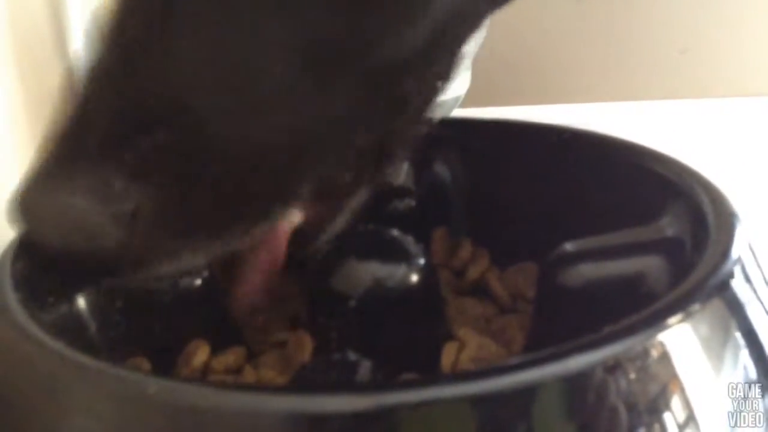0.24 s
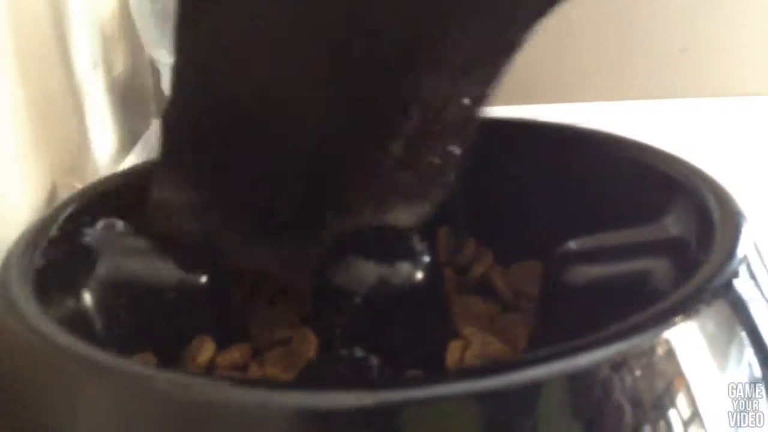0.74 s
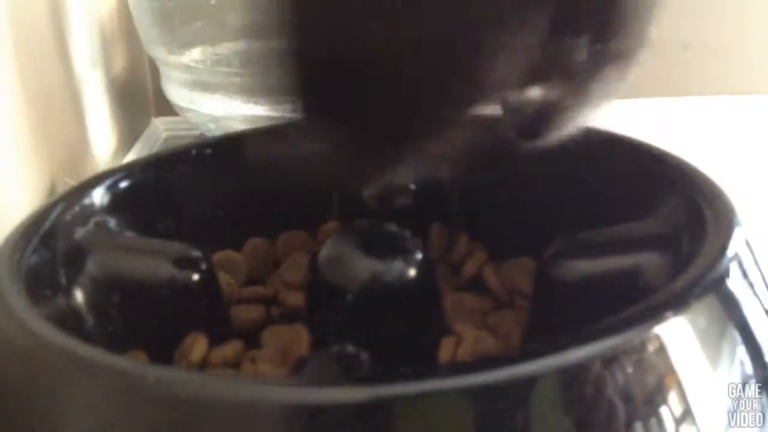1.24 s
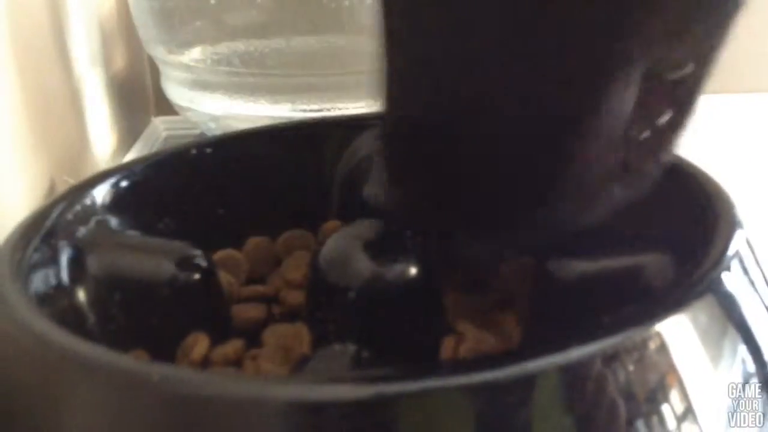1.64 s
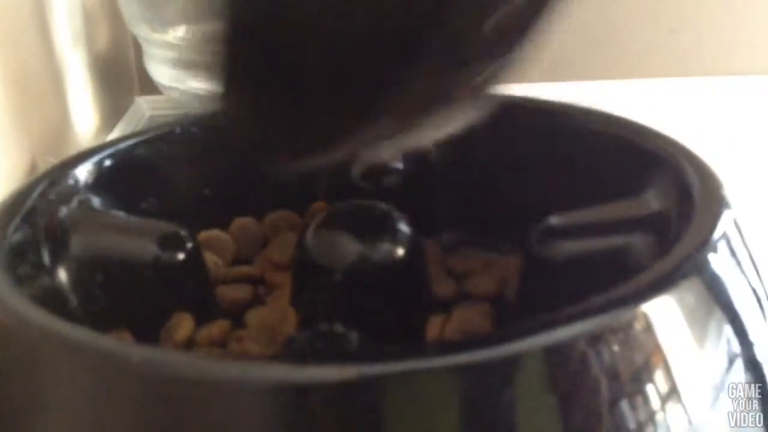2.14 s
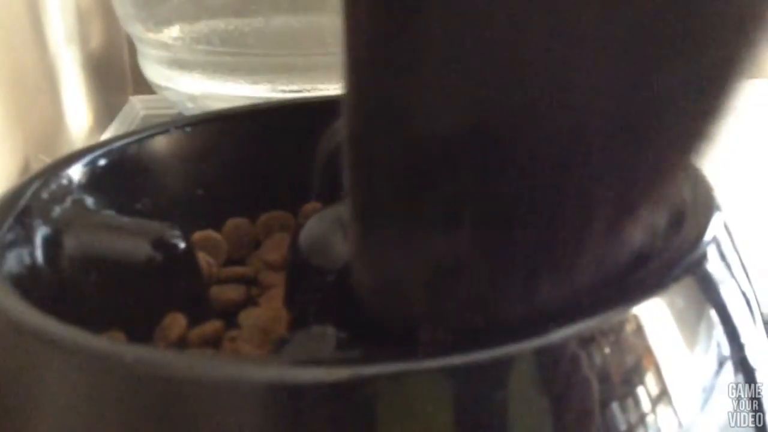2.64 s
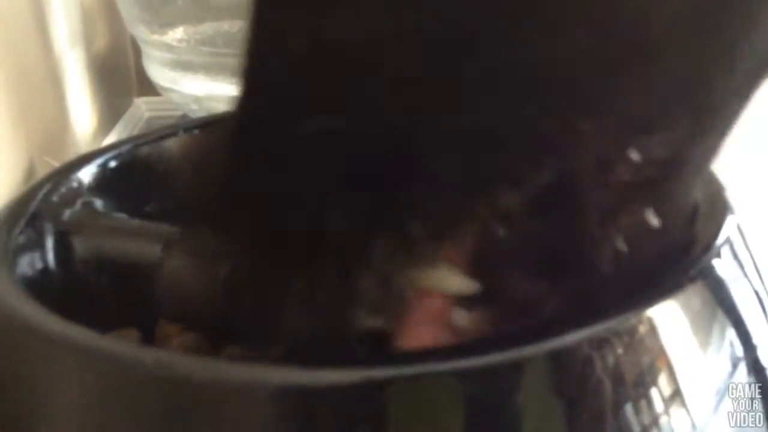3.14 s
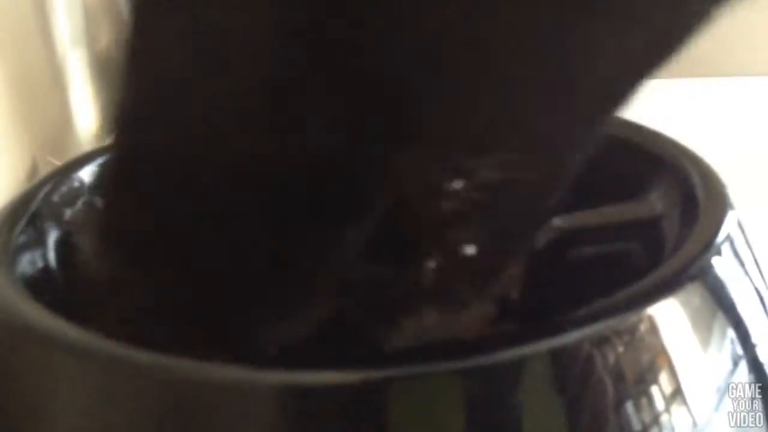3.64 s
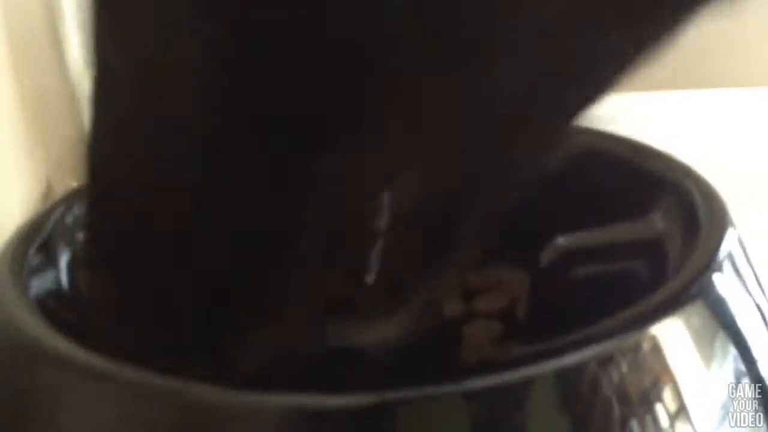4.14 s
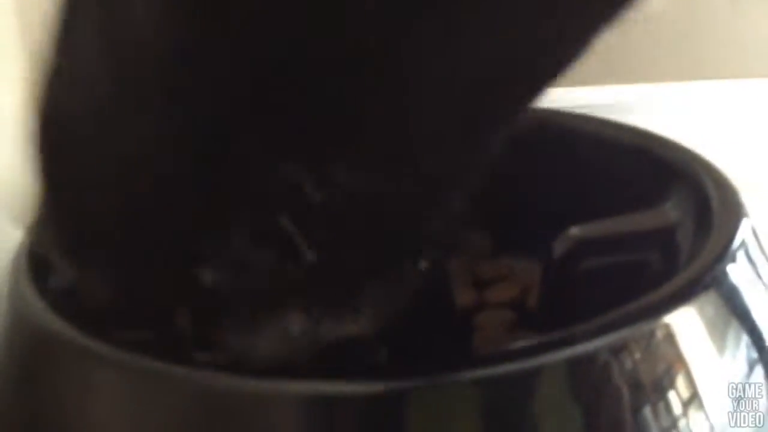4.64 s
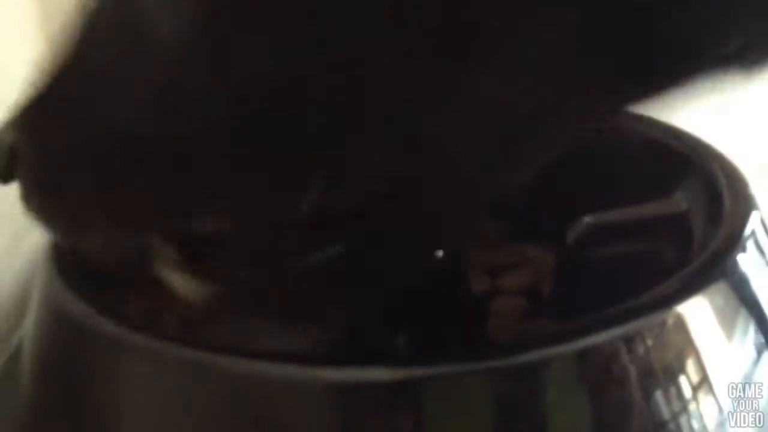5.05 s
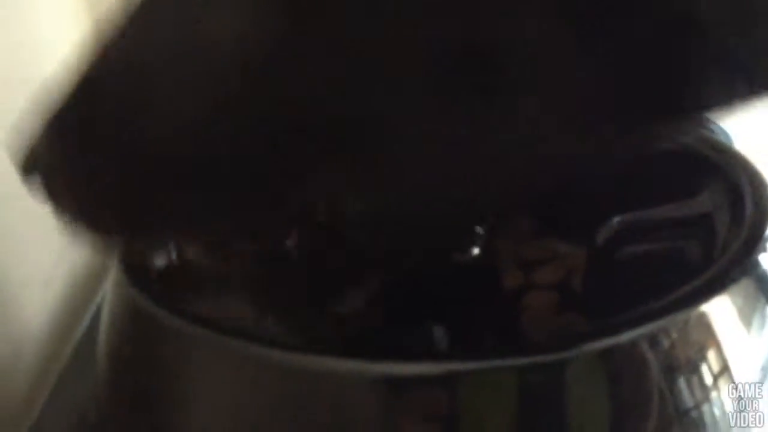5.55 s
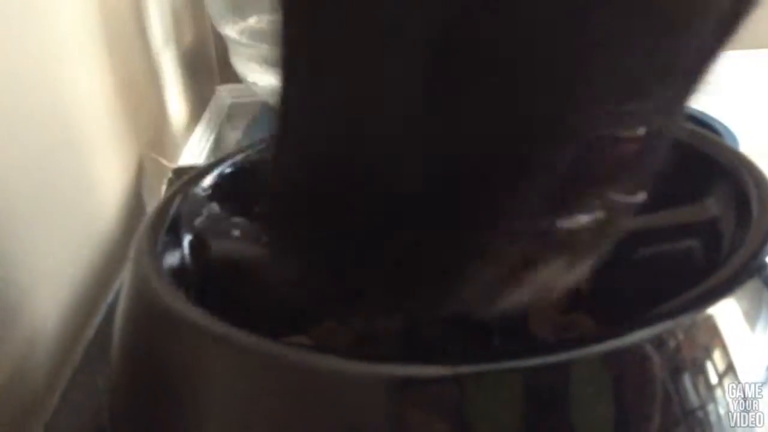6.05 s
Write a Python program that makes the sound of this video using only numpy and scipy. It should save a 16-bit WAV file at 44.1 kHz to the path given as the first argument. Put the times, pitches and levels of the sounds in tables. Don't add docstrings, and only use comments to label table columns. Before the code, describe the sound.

Close, crisp dog eating indoors: kibble rattling and snapping, teeth tapping the bowl, the bowl knocking on its stand, tongue licking and slurping.

```python
import sys
import numpy as np
from scipy import signal
from scipy.fft import rfft, irfft, next_fast_len
from scipy.io import wavfile
from scipy.ndimage import uniform_filter1d, map_coordinates

SR = 44100
rng = np.random.default_rng(int(sys.argv[2]) if len(sys.argv) > 2 else 0)


def wav_out(sig):
    wavfile.write(sys.argv[1], SR, np.round(np.clip(np.atleast_2d(sig).T, -1, 1) * 32767).astype(np.int16))


def voltage_ratio(decibels):
    exponent = np.asarray(decibels, float) / 20
    return 10 ** exponent


N = 277389

# frequency in Hz, level in dB per Hz.
HUSH_SPECTRUM = [(30, -9), (90, -18), (200, 1), (4500, -21), (5800, -22), (15300, -23)]
# frequency in Hz, t60 in seconds.
ROOM_T60 = [(200, 0.4), (3000, 0.13), (14000, 0.14)]
# frequency in Hz, level in dB per Hz.
LICK_SPECTRUM = [(90, -19.5), (230, -2.5), (365, -10), (620, -5.5), (1500, -7.5), (5000, -38.5)]
# start in seconds, end in seconds, cavity from Hz, cavity to Hz, level in dB.
SLURPS = [
    (1.45, 1.521, 592, 1004, -49),
    (5.735, 5.79, 470, 898, -41),
    (5.764, 5.82, 2300, 2800, -37.5),
    (1.436, 1.47, 1550, 1850, -50.5),
    (5.83, 5.89, 861, 510, -39.5),
    (6.1, 6.17, 600, 860, -41.5),
    (2.547, 2.573, 550, 540, -41),
    (3.5, 3.54, 520, 600, -42.5),
]
# time in seconds, level in dB, mouth cavity in Hz.
SMACKS = [(0.521, -39.5, 630), (0.649, -20, 1025), (0.661, -30.5, 408), (0.949, -35.5, 950),
          (1.21, -43, 526), (1.666, -47.5, 560), (2.305, -35, 560), (2.788, -48.5, 607), (3.03, -37, 680),
          (3.788, -36.5, 530), (4.072, -32.5, 797), (4.394, -36.5, 530), (4.441, -42, 720),
          (4.523, -42, 424), (4.536, -53, 460), (4.547, -49, 436), (5.011, -51, 600), (5.076, -35.5, 863),
          (5.519, -37, 560), (5.858, -35, 624), (5.889, -28, 877), (6.069, -49.5, 1590), (6.142, -38, 797)]
# time in seconds, level in dB, strongest mode in Hz.
KNOCKS = [(0.004, -33, 209), (0.542, -23.5, 174), (0.653, -31, 353), (0.85, -36, 248), (0.899, -35, 272),
          (0.975, -22, 242), (1.301, -36, 204), (1.588, -49, 190), (1.667, -34.5, 260), (1.836, -22, 226),
          (1.893, -21.5, 207), (1.941, -37, 203), (2.307, -38, 298), (2.53, -36.5, 202), (2.8, -34.5, 247),
          (2.835, -19.5, 256), (3.2102, -17.5, 233), (3.2218, -21, 235), (3.2342, -18, 236),
          (3.2458, -22, 235), (3.29, -31, 215), (3.372, -30.5, 230), (3.437, -30, 223), (3.554, -16, 233),
          (3.79, -38, 246), (3.816, -35, 230), (4.071, -36, 284), (4.126, -25, 246), (4.469, -29, 202),
          (4.876, -38, 305), (4.993, -24.5, 226), (5.012, -26, 240), (5.729, -40.5, 190), (5.86, -31, 170),
          (5.89, -26.5, 220), (6.15, -41, 237)]
# centre in Hz, width in Hz, level in dB.
STAND_MODES = [(190, 108, -3), (219, 52, 0.5), (307.3, 45, -3), (558, 61, -7)]
WALL_MODES = [(1000, 200, -15), (1123, 80, -2), (1495, 95, -8), (1690, 130, -7), (1990, 130, -9)]
RIM_MODES = [(2544, 315, 1.5), (2680, 355, 5), (2931, 735, -0.5)]
PELLET_MODES = [(4450, 800, 0), (5100, 900, -1)]
CRACK_MODES = [(6500, 1800, -9), (8250, 1200, 0.5), (10500, 2600, -7.5), (13000, 4500, -9)]
# time in seconds, level in dB, pitch in Hz.
CLINKS = [(0.065, -36, 1050), (0.1146, -30.5, 1120), (0.1672, -30, 3160), (0.4084, -37.5, 2940),
          (0.442, -35, 2740), (0.454, -36, 2730), (0.6185, -34, 1700), (0.6555, -22, 2740),
          (0.663, -26.5, 2960), (0.814, -32.5, 2870), (0.9572, -28, 1100.0), (0.9749, -30, 1047),
          (0.997, -36, 994), (0.649, -16, 1040), (1.5478, -41.5, 1485), (2.992, -11, 1130),
          (2.3242, -33, 677), (2.5327, -40, 3050), (5.294, -25, 1143), (2.848, -32, 2770),
          (3.019, -29, 2660), (3.275, -20.5, 3050), (3.4163, -21, 1555), (3.5606, -24, 1126),
          (3.6006, -26, 1520), (3.6147, -34, 2770), (3.6358, -26, 2660), (3.664, -31, 1530),
          (3.7152, -25, 2670), (3.7944, -30.5, 1730), (3.836, -31.5, 3090), (3.8935, -34, 2740),
          (5.162, -24.5, 1143), (4.1476, -34, 1670), (4.1988, -31.5, 1720.0), (4.4583, -32, 1160),
          (4.4682, -25.5, 2790), (4.7392, -34, 985), (4.8954, -38, 2930), (4.9242, -32, 1063),
          (5.013, -28, 2710), (5.1732, -27, 3030), (5.1782, -28, 2670), (5.186, -31, 1125),
          (5.1952, -37, 2720), (5.2156, -32, 2710.0), (5.296, -23.5, 2830), (5.3462, -27.5, 1148),
          (5.4172, -28.5, 2680), (1.4213, -37, 1700), (5.5454, -38, 592), (3.057, -35, 1124),
          (5.7638, -36, 2570), (5.776, -34, 834), (5.7902, -33, 2550), (5.8216, -26, 2750),
          (5.8327, -33, 2410), (5.859, -37, 1070.0), (5.8931, -29, 2520), (3.012, -20.5, 1110)]
# time in seconds, level in dB, pitch in Hz.
CLACKS = [(0.3547, -36, 4440), (0.6051, -36, 4670), (0.6121, -38, 4560), (0.6281, -22.5, 5040),
          (0.6405, -33, 4730), (0.9498, -23, 4760.0), (1.2901, -36, 4020), (1.4722, -42, 4090.0),
          (1.4866, -42, 4870.0), (1.6772, -47, 4000.0), (1.74, -22.5, 4750), (1.746, -27, 4500),
          (1.7605, -30, 4800), (1.8338, -25, 4730), (1.8518, -25, 5020), (1.9291, -31, 4830),
          (1.9496, -30, 4650), (2.3202, -30.5, 4350), (2.3721, -50, 5040.0), (2.3816, -41, 4820),
          (2.4434, -46, 4550), (2.6185, -38, 3960), (2.9742, -26.5, 5600), (3.0775, -25, 4400),
          (3.1234, -24, 4480), (3.1927, -39, 4740), (3.2376, -30, 4900), (3.7315, -26.5, 4740),
          (3.9555, -43, 4100), (4.1401, -37, 4000), (4.164, -38, 4500), (4.2643, -41, 4930),
          (4.5881, -43.5, 4400), (4.6953, -41.5, 4920), (1.402, -45, 2300), (4.8719, -46, 4580.0),
          (5.0226, -21.5, 4440), (5.3134, -33, 4900), (5.922, -41, 4170), (2.904, -40, 5250)]
# time in seconds, level in dB, pitch in Hz.
SPLINTERS = [(0.0294, -35.5, 10900), (0.0379, -33, 13700), (0.1092, -30.5, 13300), (0.1442, -31.5, 12500),
             (0.3248, -34, 8900), (0.5822, -34, 9200), (0.648, -31, 12650.0), (0.6535, -30, 13600),
             (0.9498, -32, 13900), (0.9957, -35, 13500), (5.007, -31, 13100), (1.2302, -39, 8300),
             (1.2452, -38, 14100.0), (1.2711, -43, 11770.0), (2.0269, -40, 8750), (4.1041, -36, 13400),
             (2.3112, -39, 14000), (2.3417, -40, 12790.0), (1.4501, -31, 12800), (2.5322, -37, 13670.0),
             (2.5871, -24, 10000), (2.8301, -41, 14280.0), (2.8435, -32.5, 8200), (2.9842, -22, 8260),
             (3.1633, -22, 8040), (3.1987, -25, 7900), (3.2686, -22, 13570.0), (3.4462, -23, 8150),
             (3.4706, -23.5, 13600), (3.8258, -36, 11400.0), (3.9475, -44, 8080.0), (4.1067, -32, 7900),
             (4.199, -22, 7980), (4.4115, -40, 13300), (4.4304, -39, 8050.0), (4.7402, -42, 8300),
             (4.164, -32, 13200), (4.8495, -37, 14400), (5.0326, -20, 8100), (5.0934, -23, 8400),
             (5.3, -28, 12800.0), (5.4631, -41, 7640), (5.5175, -42, 13700), (5.5579, -42, 13940.0),
             (5.8396, -43, 14200), (5.8901, -27, 14350.0)]
# start in seconds, held in seconds, level in dB.
STROKES = [(0, 0.033, -41), (0.099, 0.097, -38), (0.279, 0.12, -41.5), (0.439, 0.018, -40),
           (0.512, 0.15, -36.5), (0.816, 0.077, -39.5), (0.921, 0.11, -39.5), (1.21, 0.017, -46),
           (1.285, 0.024, -48), (1.42, 0.11, -50), (1.66, 0.058, -48.5), (1.74, 0.032, -36.5),
           (1.816, .05, -31.5), (1.87, 0.057, -29), (1.93, 0.029, -33.5), (2.009, .02, -46),
           (2.092, 0.031, -44.5), (2.189, 0.027, -42.5), (2.301, 0.011, -42.5), (2.335, 0.14, -49.5),
           (2.516, 0.011, -36.5), (2.578, 0.067, -42.5), (2.79, .03, -42), (2.835, 0.049, -34),
           (2.905, .04, -37), (2.95, 0.024, -23.5), (2.978, 0.053, -23), (3.052, 0.024, -29),
           (3.113, 0.039, -19.5), (3.19, 0.13, -31), (3.396, 0.04, -26.5), (3.5, 0.03, -40),
           (3.556, .095, -35.5), (3.699, 0.03, -27), (3.787, 0.096, -31.5), (3.94, 0.087, -40),
           (4.065, 0.12, -35.5), (4.255, 0.05, -42.5), (4.379, 0.076, -33), (4.5, 0.043, -50.5),
           (4.677, .12, -44.5), (4.889, 0.065, -33), (5.005, 0.069, -22), (5.16, 0.03, -29),
           (5.288, 0.047, -29), (5.414, 0.026, -43), (5.51, 0.043, -41), (5.712, 0.1, -41),
           (5.969, 0.027, -48), (6.1, 0.042, -45), (6.261, 0.028, -48)]
# time in seconds, idle shuffling in dB, dryness in dB, wetness in dB.
MUZZLE = [(0, -49.5, 3.5, -3.5), (.7, -47, 3, 0.5), (1.18, -52.5, 2.5, 4), (1.3, -51, 9, -1),
          (1.6, -55, 2, -5), (1.72, -48, 0, -3.5), (2.28, -67, 1.5, 0.5), (2.44, -52, 12.5, -3),
          (2.68, -73, 0.5, -3.5), (2.77, -83, -1, 5), (2.9, -43, -0.5, -7.5), (3.5, -44.5, 0, -3),
          (4, -50.5, -4, -3.5), (4.631, -64, -4, 4.5), (5.1, -32, 2, -1.5), (5.47, -43.5, 2, -1),
          (5.78, -44.5, 6, -2), (6.08, -52.5, -1.5, 2.5), (6.29, -48.5, -7, 1.5)]
# time in seconds, level in dB, brightness in dB.
TAPS = [(0.0645, -30.5, -6), (0.164, -25.5, -5), (0.5197, -23.5, -24), (0.618, -21, -19),
        (0.63, -17.5, -32), (0.6627, -23, -20), (0.8165, -21, -9), (0.8724, -28, -19), (0.9733, -24.5, -5),
        (1.422, -37, -38), (1.871, -13, -3), (2.0234, -25.5, -32), (2.3084, -24.5, -3), (2.861, -17.5, -22),
        (2.9915, -7, -5), (3.398, -21, -15), (3.4158, -20, -4), (3.6143, -23, -23), (3.6344, -16.5, -24),
        (3.6634, -33, -3), (3.9888, -25.5, -11), (4.0751, -16.5, -11), (4.1257, -19.5, -6),
        (4.1784, -30, -6), (4.4677, -21, -8), (4.7381, -27, -21), (4.9166, -22, -38), (5.0406, -35, 15),
        (5.1631, -14, -7), (5.2937, -18.5, -3)]
# time in seconds, level in dB, brightness in dB.
TICKS = [(0.1423, -19.5, -23), (0.648, -14.5, -15), (0.7786, -33.5, -1.5), (0.9489, -27, -9),
         (0.9554, -13.5, -8), (1.1248, -31, -5.5), (1.2216, -19.5, -5), (1.2708, -26, -4),
         (1.487, -28, -14), (1.86, -27, 4), (2.1062, -37, 17), (2.3169, -23.5, -5.5), (2.3416, -30, -13),
         (3.142, -14.5, -0.5), (3.714, -15.5, -10.5), (3.9405, -36, -3), (4.0955, -25, -5),
         (4.1171, -22, -0.5), (4.2914, -31.5, -7), (4.3879, -21.5, -6.5), (4.6943, -35, -3),
         (4.846, -29, -15), (4.9354, -23, -7), (5.5185, -27, -16), (5.5455, -26, -4), (5.7332, -24, -9),
         (5.8217, -20, -10.5), (5.89, -14.5, -13), (5.9983, -34, -11)]
# time in seconds, level in dB, dullness in dB.
SNAPS = [(0.0383, -24, -34), (0.3088, -20, -14), (0.339, -18.5, -10), (0.442, -21.5, -8.5),
         (0.5895, -18.5, -13), (0.9352, -16.5, -6), (1.4398, -33.5, -5), (1.506, -27, 0.5),
         (1.7404, -25, -5), (1.8527, -25, -13), (1.8764, -4, -23), (1.8919, -9.5, -2), (1.9116, -14.5, -6),
         (2.0924, -14.5, -16.5), (2.5798, -28, -22), (2.587, -25.5, -4), (3.0547, -10, -17),
         (3.1176, -17.5, 6), (3.262, -12.5, -24), (3.4466, -19.5, -2), (3.471, -12.5, -22),
         (3.8352, -28.5, -3), (3.874, -23.5, -2), (4.1997, -12.5, -18), (4.4239, -23.5, -9),
         (5.0011, -24, -13), (5.0325, -15, -16), (5.2848, -28, -9), (5.8947, -37, -4)]
# time in seconds, level in dB, brightness in dB.
CRUSHES = [(0.1026, -24.5, 2), (0.1863, -20, 3.5), (1.29, -30, -0.5), (1.6642, -44, 2), (1.748, -18.5, -6),
           (1.834, -21.5, -3), (2.5165, -28, -19), (2.8343, -27, -13), (3.025, -16.5, 4.5), (3.065, -17, 0),
           (3.1214, -19.5, 7.5), (3.128, -6.5, -4.5), (3.2082, -33, 10), (3.275, -22.5, 9.5),
           (3.5538, -14, -4), (3.704, -19.5, -20), (3.8633, -23, -8), (4.2551, -29, -12), (4.588, -39, -25),
           (5.023, -18, -4), (5.0775, -13.5, 8), (5.3388, -15.5, -3), (5.416, -13, -4), (5.7119, -27, -37),
           (5.8587, -29, 1), (6.1406, -35.5, -21)]
TAP_DRIVE = (0, -1.5, -10, 0), (0, 0.1, 0.14, 1)
TICK_DRIVE = (-10.5, 0.0051, 0.085, -6.5), (0, 0.0079, 0.95, 0.96)
SNAP_DRIVE = (-3, -4.5, -5.5, 0), (1, 0.55, 0.4, 0.21)
CRUSH_DRIVE = (-0.39, 0.036, -5.5, 0.26), (0.15, 0.012, 1, 0.89)

MIDDLE_DB = -39.5
SWELL_S, FADE_S = 0.012, 0.053


def unit(x):
    return x / np.sqrt(np.mean(x ** 2) + 1e-20)


def along(points, hz):
    f, v = np.transpose(points)
    return np.interp(np.log(hz + 1), np.log(f + 1), v)


def wobble(knots_per_s):
    knots = rng.standard_normal(int(N * knots_per_s / SR) + 4)
    return map_coordinates(knots, [np.arange(N) * knots_per_s / SR])


def filtered(x, response):
    m = next_fast_len(N + SR // 2)
    return irfft(rfft(x, m) * response(np.fft.rfftfreq(m, 1 / SR)), m)[..., :N]


def placed(times_s, rows, lead=0):
    first = np.round(times_s * SR).astype(int)[:, None]
    at = np.maximum(first + np.arange(rows.shape[1]) - lead, 0)
    return np.bincount(at.ravel(), rows.ravel(), N + SR)[:N]


def floor():
    phase = 2 * np.pi * 119.5 * np.arange(N) / SR + 0.5 * wobble(6)
    hum = voltage_ratio(-57.5 + 2.1 * wobble(9)) * np.sin(phase)
    hush = filtered(rng.standard_normal(N), lambda f: voltage_ratio(along(HUSH_SPECTRUM, f)))
    return hum + voltage_ratio(-60.0 + 1.8 * wobble(7.3)) * unit(hush)


def room(x):
    hz, t, z = signal.stft(rng.standard_normal(SR // 3), SR, nperseg=256)
    decay = voltage_ratio(-60 * t / along(ROOM_T60, hz)[:, None])
    tail = signal.istft(z * decay, SR, nperseg=256)[1]
    return signal.fftconvolve(np.pad(x, (200, 0)), tail / np.linalg.norm(tail))[:N]


def ring(force, modes, touch_db):
    def mode(f, centre_hz, width_hz):
        damping = 1j * f * width_hz
        return (damping / (centre_hz ** 2 - f * f + damping)) ** 2

    grid_hz = np.linspace(0, SR / 2, num=20000)
    energy, out = 0, 0
    for k, (centre_hz, width_hz, db) in enumerate(modes):
        energy += voltage_ratio(2 * db) * np.mean(np.abs(mode(grid_hz, centre_hz, width_hz)) ** 2)
        drive = force * voltage_ratio(db + touch_db * wobble(25))
        out = out + filtered(drive, lambda f: 1j ** k * mode(f, centre_hz, width_hz))
    return out / np.sqrt(energy)


def grains(per_s, spread_db, clump_db):
    chance, sign, size = rng.random(N), rng.standard_normal(N), rng.exponential(size=N)
    strength = voltage_ratio(spread_db * np.minimum(size, 4) + clump_db * wobble(50))
    hits = (chance < per_s / SR) * sign * strength
    power = uniform_filter1d(uniform_filter1d(hits ** 2, size=2500), size=2500)
    return hits / np.sqrt(np.abs(power) + 0.17 * np.median(power))


def stirring():
    t = np.arange(0, N + 64, 64) / SR
    start_s, held_s, db = np.transpose(STROKES)[:, :, None]
    at_s, *columns = np.transpose(MUZZLE)
    idle_db, dry_db, wet_db = [np.interp(t, at_s, c) for c in columns]
    swell = (start_s - t).clip(0) / SWELL_S
    fade = (t - start_s - held_s).clip(0) / FADE_S
    strokes = voltage_ratio(db - 20 * (swell + fade))
    stir_db = 20 * np.log10(strokes.sum(axis=0) + voltage_ratio(idle_db - 4.5)) - MIDDLE_DB
    wall_db = stir_db - 0.34 * dry_db
    rim_db = stir_db + 0.22 * dry_db
    crackle_db = 1.064 * stir_db + dry_db
    lick_db = 0.62 * stir_db + wet_db - 4
    levels = wall_db, rim_db, crackle_db, lick_db
    return [np.interp(np.arange(N) / SR, t, MIDDLE_DB + c) for c in levels]


def slurps():
    t = np.arange(N) / SR
    flutter = 0.5 + wobble(220)
    out = np.zeros(N)
    for start_s, end_s, from_hz, to_hz, db in SLURPS:
        u = np.clip((t - start_s) / (end_s - start_s), 0, 1)
        hz = (from_hz + (to_hz - from_hz) * u) * (1 + 0.09 * wobble(150))
        swell = np.sqrt(np.sin(np.pi * u).clip(0))
        out += voltage_ratio(db + 6.5) * swell * flutter * np.sin(2 * np.pi * np.cumsum(hz) / SR)
    return out


def mouth():
    s, db, hz = np.transpose(SMACKS)[:, :, None]
    t = np.arange(SR // 10) / SR
    noise = uniform_filter1d(rng.standard_normal((len(s), len(t))), size=40) * np.sqrt(40)
    envelope = voltage_ratio(db + 16.0 - 60 * t / 0.034) * (1 - np.exp(-t / 0.001))
    cavity = np.sin(2 * np.pi * hz * t * (1 + 2.0 * t))
    pops = placed(s[:, 0], envelope * cavity * (1 + 0.69 * noise))
    wet = voltage_ratio(stirring()[3] - 3.0) * grains(per_s=1300, spread_db=-4, clump_db=7.0)
    licking = filtered(wet, lambda f: voltage_ratio(along(LICK_SPECTRUM, f) + 19))
    return filtered(pops, lambda f: (f / (f - 250j)) ** 2) + licking


def stand():
    s, db, hz = np.transpose(KNOCKS)[:, :, None]
    t = np.arange(SR // 6) / SR
    push = voltage_ratio(db + 5) * t / 0.00051 * np.exp(-t / 0.00026)
    second = 0.85 * voltage_ratio(rng.normal(0, 1.5, db.shape)) * np.sin(2 * np.pi * 316 * t)
    pair = np.sin(2 * np.pi * hz * t) + second
    boom = voltage_ratio(db + 1.5 - 60 * t / 0.06) * (1 - np.exp(-t / 0.00067)) * pair
    rocking = voltage_ratio(stirring()[3] - 10.5) * grains(per_s=300, spread_db=1.0, clump_db=-0.5)
    rung = ring(placed(s[:, 0], push) + rocking, STAND_MODES, touch_db=5.0)
    return rung + placed(s[:, 0], boom) * voltage_ratio(1.6 * wobble(90))


def struck(rows, lift_db, t60_s, spread):
    s, db, hz = np.transpose(rows)[:, :, None]
    t = np.arange(SR // 30) / SR
    detune, start = rng.uniform(-1, 1, (len(rows), 2, 16)).transpose(1, 2, 0)[..., None]
    partials = np.sin(2 * np.pi * hz * (1 + spread * detune) * t + np.pi * start)
    cluster = partials.sum(axis=0) / 4
    envelope = voltage_ratio(db + lift_db - 60 * t / t60_s) * (1 - np.exp(-t / 0.00071))
    return placed(s[:, 0], envelope * cluster)


def crumbs():
    fizz_db = MIDDLE_DB - 23.0 + 0.52 * (stirring()[2] - MIDDLE_DB)
    fizz = voltage_ratio(fizz_db) * grains(per_s=4200, spread_db=12, clump_db=3)
    wall = [row for row in CLINKS if row[2] < 1200]
    rim = [row for row in CLINKS if row[2] >= 1200]
    out = struck(wall, lift_db=3, t60_s=0.09, spread=0.012)
    out += struck(rim, lift_db=8, t60_s=0.03, spread=0.16)
    out += struck(CLACKS, lift_db=10, t60_s=0.016, spread=0.17)
    out += struck(SPLINTERS, lift_db=11, t60_s=0.011, spread=0.24)
    return out + ring(fizz, [(10900, 1500, -6.0), (13900, 1600, 4.0)], touch_db=1.5)


def contacts():
    kinds = (TAPS, TAP_DRIVE), (TICKS, TICK_DRIVE), (SNAPS, SNAP_DRIVE), (CRUSHES, CRUSH_DRIVE)
    out = []
    for rows, (share_db, follow) in kinds:
        for s, db, colour_db in rows:
            out.append((s, *(db + np.array(share_db) + colour_db * np.array(follow))))
    return np.transpose(out)


def blows(times_s, db, t60_s, debris_db):
    lead = SR // 100
    t = (np.arange(SR // 12) - lead) / SR
    shape = len(times_s), len(t)
    creak = voltage_ratio(-6 + 60 * t / 0.012)
    snap = voltage_ratio(-60 * t / t60_s) + 1.6 * voltage_ratio(-60 * t / 0.0052)
    burst = np.where(t < 0, creak, snap)
    debris = (t > 0) * voltage_ratio(debris_db - 60 * t / 0.084 + 6.1 * rng.standard_normal(shape))
    force = rng.standard_normal(shape) * (burst + debris)
    force /= np.linalg.norm(force, axis=1, keepdims=True)
    return placed(times_s, force * voltage_ratio(db)[:, None], lead=lead)


def kibble():
    s, wall_db, rim_db, pellet_db, crack_db = contacts()
    wall_rattle_db, rim_rattle_db, crackle_db, _ = stirring()
    heap = grains(per_s=950, spread_db=4.5, clump_db=4)

    rattle = 0.71 * heap + grains(per_s=1200, spread_db=4.0, clump_db=4.5)
    wall = blows(s, wall_db + 15.0, t60_s=0.017, debris_db=-32.5) + voltage_ratio(wall_rattle_db - 11.5) * rattle

    rattle = heap + 0.79 * grains(per_s=2000, spread_db=4.5, clump_db=5)
    rim = blows(s, rim_db + 21.5, t60_s=0.012, debris_db=-12.0) + voltage_ratio(rim_rattle_db - 1.5) * rattle

    rattle = 0.74 * heap + 0.59 * grains(per_s=2700, spread_db=1, clump_db=4.5)
    pellet = blows(s, pellet_db + 21.0, t60_s=0.024, debris_db=-25) + voltage_ratio(crackle_db - 9.5) * rattle

    rattle = 0.64 * heap + 0.61 * grains(per_s=4700, spread_db=2.5, clump_db=8)
    crack = blows(s, crack_db + 17.5, t60_s=0.017, debris_db=-16.5) + voltage_ratio(crackle_db - 12.0) * rattle

    bowl = ring(wall, WALL_MODES, touch_db=2.5) + ring(rim, RIM_MODES, touch_db=2.5)
    return bowl + ring(pellet, PELLET_MODES, touch_db=3) + ring(crack, CRACK_MODES, touch_db=1.5)


def scene():
    meal = slurps() + mouth() + stand() + crumbs() + kibble()
    return (floor() + voltage_ratio(-13.0) * room(meal) + meal)[None]


def top_cut(x):
    return signal.sosfilt(signal.butter(12, 16460, fs=SR, output="sos"), x)


def record(dry):
    top_hz = 15350
    soft = dry / (1 + np.abs(dry / 0.75) ** 4) ** (1 / 4)
    mix = filtered(soft, lambda f: (f / (f + 1e-9 - 70j)) ** 2 / (1 + (f / top_hz) ** 130))
    return top_cut(mix)


dry = scene()
out = record(dry)
wav_out(out)
```